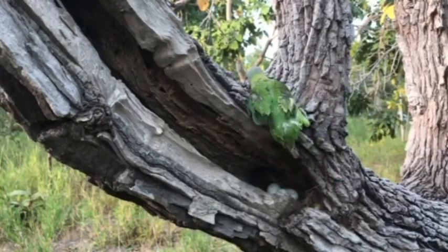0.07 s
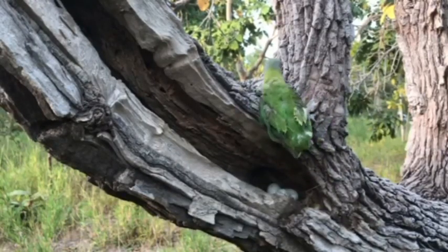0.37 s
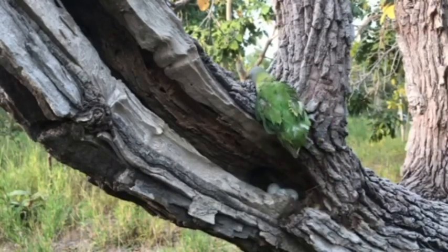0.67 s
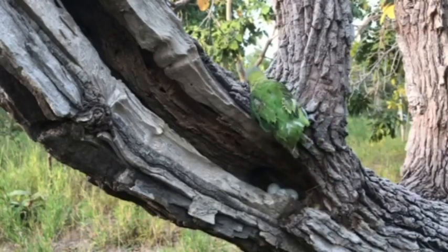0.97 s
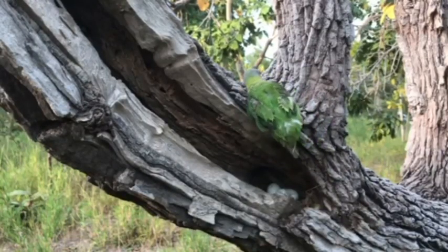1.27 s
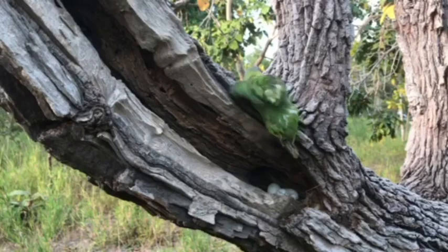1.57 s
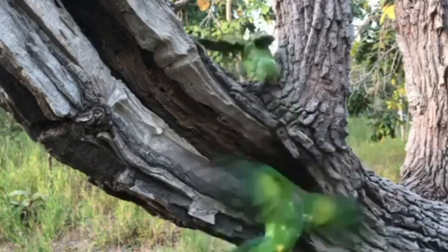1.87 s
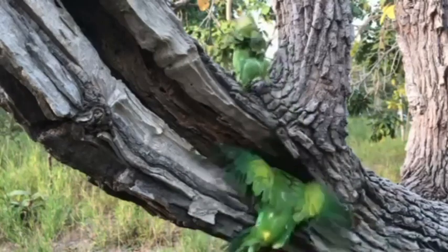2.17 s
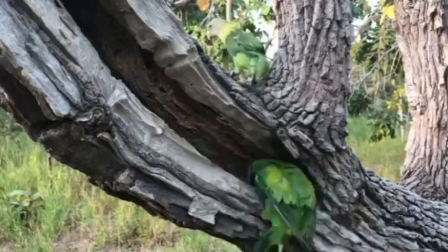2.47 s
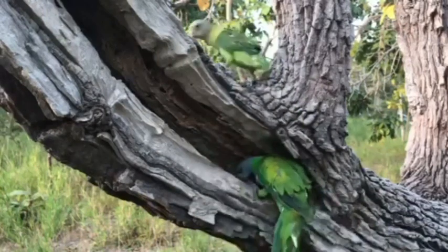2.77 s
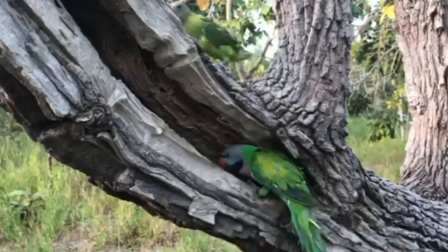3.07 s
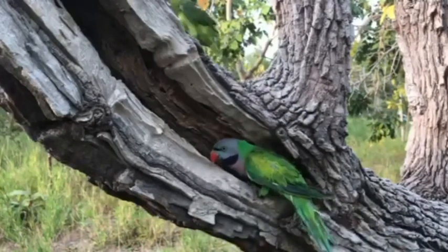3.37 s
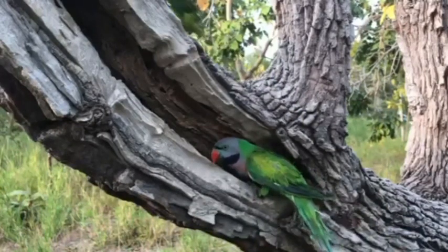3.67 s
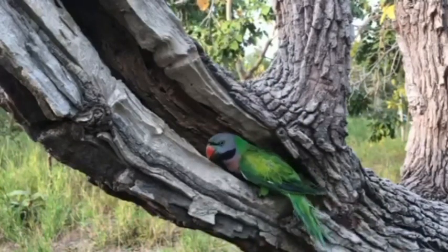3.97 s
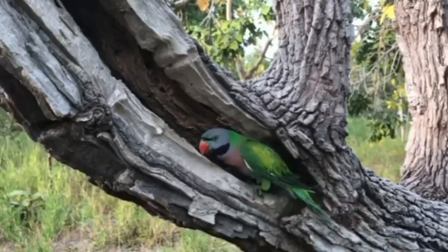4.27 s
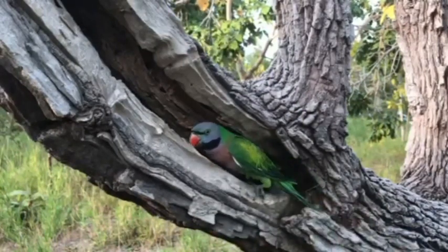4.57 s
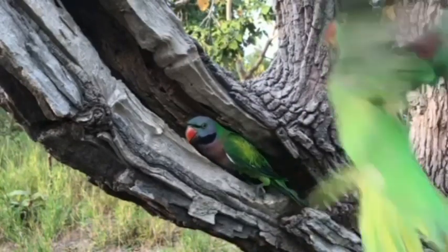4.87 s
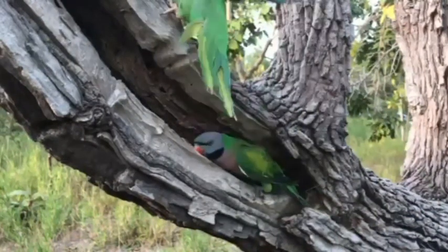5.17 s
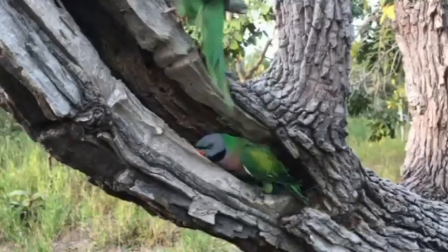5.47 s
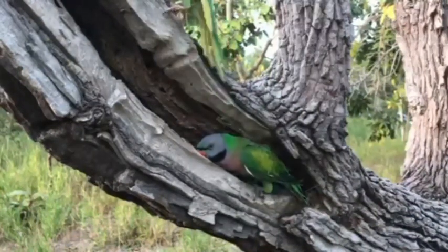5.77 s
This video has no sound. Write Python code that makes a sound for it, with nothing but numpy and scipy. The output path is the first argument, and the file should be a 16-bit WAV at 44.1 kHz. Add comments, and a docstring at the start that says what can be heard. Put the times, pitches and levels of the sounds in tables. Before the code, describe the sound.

A quiet forest with a soft hush of leaves, a low traffic rumble and a far engine gradually slowing is heard throughout. A faint distant whistle opens, and close claws tick lightly on bark. From about 1.6 to 2.3 seconds a parakeet lands with flapping wings, rustling feathers, sharp scratches and several dull knocks on a hollow limb. It gives a few soft, short nasal rasps between 2.1 and 2.9 seconds. Sparse ticks and shuffles follow, while a far bird faintly chatters and sings rising notes, ending on a hoarse falling one around 4.5 seconds. From 4.7 to 5.3 seconds comes the loudest moment: a second bird flutters past very close, its wings swishing and pushing thudding puffs of air at the microphone, with sharp clicks on bark and one knock. Light scratching and feather rustling continue until about 6 seconds.

```python
"""A parakeet flaps onto a dead tree and claws its way up the bark into a hollow. Later it takes off again in a
flurry of close wingbeats. Claws and wing tips tick and scrape on the bark, and heavy blows make the hollow limb
knock. Feathers rustle as they slide over each other, wings push puffs of air at the microphone, and a parakeet
gives short rasps. Behind it all are a few faint bird calls, a far engine slowing down and a quiet forest with a
low rumble of traffic."""
import sys
import numpy as np
from scipy import signal
from scipy.fft import rfft, irfft, next_fast_len
from scipy.io import wavfile
from scipy.ndimage import map_coordinates

SR = 44100
rng = np.random.default_rng(int(sys.argv[2]) if len(sys.argv) > 2 else 0)


def transcribe(signal):
    """Save signal, clipped to [-1, 1], as a 16-bit WAV file at the path in sys.argv[1]."""
    frames = np.atleast_2d(signal).T
    limited = np.clip(frames, -1, 1)
    pcm = np.round(limited * 32767).astype(np.int16)
    wavfile.write(sys.argv[1], SR, pcm)


N = 265967

# claws and wing tips striking bark: (time [s], level [dB], low knock [relative dB],
# brightness [dB per octave], ring of the struck flake [Hz], ring strength [dB], crumbling [0-1])
TAPS = [(0.425, -59, -6, 2, 1140, 11, 0.16), (0.7744, -61.5, 1, -6, 2800, 18, 0.02),
        (0.876, -63, 0, 16, 3060, 28, 0.17), (0.9349, -57, -1, 4.5, 3500, 14, 0.09),
        (1.043, -55.5, -3, 2.5, 5600, -2, 0.3), (1.3107, -50.5, -16, 3, 2600, 11, 0.07),
        (1.334, -62, -6, 4, 2800, 10, 0.07), (1.3848, -57, -6, 2, 2610, 17, 0),
        (1.4685, -54.5, -4, -0.5, 1100, 15, 0.6), (1.557, -61.5, -1, 7, 5630, 8, 0.4),
        (1.6105, -49.5, 4, 1, 2690, 2, 0.5), (1.632, -54, 5, -5, 1500, 7, 0),
        (1.7231, -42.5, -14, -0.5, 3400, 10, 0.34), (1.7511, -41, -3.5, 1, 2410, 1, 0.1),
        (1.7584, -42, 7, -1, 2150, 11, 0.14), (1.7729, -42.5, -3, 4, 4730, 14, 0.07),
        (1.812, -45.5, 12, 7, 5660, 8, 0.14), (1.866, -37.5, 15, 3, 5600, 8, .22),
        (1.908, -39, -0.5, -1, 800, 18, 0.7), (1.945, -45.5, 4, 2, 3270, 16, 0.06),
        (1.954, -49, 9, 0, 5500, 10, 0.4), (1.977, -47, 4, -0.5, 940, 13, 0.24),
        (2.041, -43.5, 8.5, 1.5, 1840, 9, 0.15), (2.048, -48, -2, 5, 1090, 15, 0.13),
        (2.081, -37.5, 1, 1.5, 1070, 11.5, 0.1), (2.083, -42, -1, 2, 3340, 28, 0.3),
        (2.1194, -45.5, -4, 1.5, 2200, 8, 0.4), (2.149, -50, -12, -4, 3380, -2, 0.13),
        (2.185, -52.5, 1, -1.5, 1000, 21, .2), (2.247, -55.5, 26, 1.5, 600, 6, 0.26),
        (2.309, -61, 2, 0.5, 1980, 1, 0.3), (2.354, -63, -8, -1, 3200, 10, 0.3),
        (2.4181, -52.5, 9, -13, 1640, 22, 0.1), (2.548, -62, -10, 9, 6140, 11, .12),
        (2.567, -52.5, -6, -2.5, 3730, 10, 0.2), (2.6472, -56.5, 9, -4.5, 3500, 18, 0.02),
        (2.604, -59.5, -6, 1, 5500, 9, .25), (2.69, -63.5, 2, 5.5, 3600, 0, 0.3),
        (2.881, -65, -6, 6, 4600, 5, 0.18), (3.026, -65.5, -5, 4, 4900, 16, .15),
        (3.092, -65, -6, -2, 3200, 8, 0.2), (3.121, -67, -2, 1, 5300, 9, 0.3),
        (3.137, -70, -6, 1, 5030, 10, 0), (3.166, -67, 0, -4, 1900, 10, 0.4),
        (3.3349, -55, 4, -4.5, 2620, 6, 0.2), (3.521, -65.5, -6, 4, 4190, 8, .1),
        (3.559, -64, -2, 3, 3000, 6, 0.23), (3.5878, -55.5, -10, 1.5, 2840, 13, 0.5),
        (3.8478, -65, -4, 2, 3880, 12, .2), (3.9075, -59, -5, 1, 2600, 22, 0.1),
        (3.9426, -63.5, -6, 0, 2700, 20, 0.12), (3.9908, -58, 0, 4, 2600, 16, 0.06),
        (4.097, -65, 0, -3, 1500, 12, 0), (4.3574, -63, -12, 9, 4600, 12, 0.23),
        (4.6005, -58.5, -4, 2.5, 1500, 12, 0.1), (4.673, -60, -6, -3, 4000, 3, 0.3),
        (4.698, -49.5, 10, 2, 980, 21, 0.3), (4.7467, -45, -13, -7, 2400, 14, 0),
        (4.7525, -45.5, -10, 1, 2600, 8, 0.1), (4.7682, -36.5, 0, -1.5, 4580, 13, 0.11),
        (4.792, -39.5, 13, 3, 4100, 7, 0.13), (4.8344, -26, -1, 0.5, 1273, 11, .06),
        (4.8793, -41, 14, 5.5, 4910, 5, 0.05), (4.8845, -55, -12, -1, 3600, 5, 0.1),
        (4.9601, -48, 1, -0.5, 3500, 7, 0), (4.9918, -33, 2.5, -9, 5500, 6, 0.13),
        (5.0026, -39.5, 4, -17, 1270, 20, 0.15), (5.045, -40, 22, 0, 1020, 12, 0.18),
        (5.064, -32, -5, -3.5, 1500, 2, 0.15), (5.0737, -32.5, -6, -2, 4230, 3, 0.04),
        (5.2041, -66, -6, 1, 4600, 11, 0.26), (5.2188, -59, -6, 3, 4800, 12, 0.4),
        (5.277, -57.5, -9, 0, 4700, 11, 0.24), (5.3146, -53, -12, 1, 4400, 10, 0.3),
        (5.3368, -45, 3.5, 0.5, 2200, 6.5, 0.09), (5.3724, -53.5, 8, -0.5, 1020, 8, 0.25),
        (5.4128, -61, 8, 3, 4900, 10, .1), (5.48, -61.5, -1.5, -5.5, 3200, 7, 0.26),
        (5.562, -65, -9, -5, 4200, 11, .2), (5.7147, -58.5, -2, -0.5, 4900, 11, 0.07),
        (5.7389, -64, -6, -3, 4600, 7, 0.06), (5.7607, -58, 3, -1, 4500, 6, 0.33),
        (5.7947, -68, -8, 2, 4500, 17, 0.14), (5.8586, -60.5, -10, 3, 4700, 10, 0.2),
        (5.896, -67, -6, -4, 4300, 7, 0.24), (5.9341, -58.5, -13, -2, 4200, 0, 0.14)]
# claws and quills dragged over bark: (time [s], length [s], level [dB], brightness [dB per octave])
SCRAPES = [(0.918, 0.022, -64, -16), (1.01, 0.01, -64, -21), (1.327, 0.0042, -64, 3),
           (1.355, 0.023, -71, 5), (1.411, 0.012, -64, -17), (1.432, 0.013, -81, 11),
           (1.567, 0.0069, -59, -0.5), (1.601, 0.027, -55.5, -2.5), (1.676, 0.013, -59, -6),
           (1.73, 0.0096, -47.5, -2.5), (1.754, 0.03, -53, -2), (1.843, 0.011, -41.5, -2),
           (1.883, 0.018, -45.5, 2), (1.899, 0.0043, -37, 1), (1.986, 0.0064, -38, 1.5),
           (2.08, 0.0065, -47.5, -1.5), (2.18, 0.016, -57, -2), (2.273, 0.0084, -51.5, 0.5),
           (2.809, 0.01, -60, -4), (2.847, 0.0094, -62, -6), (3.994, 0.036, -66, -3),
           (4.095, 0.026, -66.5, 1), (4.988, 0.011, -38, 2), (5.061, 0.0019, -32, 9),
           (5.07, 0.0034, -37, -4), (5.304, 0.024, -61.5, -1), (5.412, 0.0071, -60.5, -2),
           (5.447, 0.0032, -59, 10), (5.594, 0.01, -65, -2), (5.861, 0.0083, -68.5, -3),
           (5.888, 0.0085, -61.5, 0), (5.93, 0.0059, -60, -3)]
# tone of bark under a claw: (frequency [Hz], relative level [dB])
BARK_TONE = [(60, -15), (180, -5), (400, -0.5), (1100, -4.5), (1450, 1.5), (1950, 1), (2450, 0.5),
             (4100, 2.5), (4900, -1), (5600, -1.5), (6500, -7.5), (7450, -16), (8500, -7), (9700, -30)]
# heavier blows on the hollow limb: (time [s], level [dB], pitch of the spot [Hz])
KNOCKS = [(1.758, -43, 369), (1.866, -40, 434), (1.903, -38, 644), (1.993, -52, 383), (2.025, -53, 288),
          (2.124, -49, 300), (2.278, -53.5, 424), (4.8349, -38, 452)]
# the limb's ringing tones: (multiple of the pitch, relative level [dB], time to fade by 60 dB [s])
LIMB_TONES = [(1, 0, 0.038), (1.63, -6.5, 0.023), (2.4, -9, .022)]
# the bird shuffles, flutters and settles: (time [s], length [s], level [dB], extra treble [dB])
MOVES = [(0.697, 0.26, -76, -7), (1.309, 0.13, -67.5, 1), (1.531, 0.3, -65.5, 1), (1.582, 0.023, -63.5, 3),
         (1.756, 0.022, -59, 2), (1.846, 0.13, -54.5, -2.5), (1.985, 0.085, -57.5, 1),
         (2.1, 0.021, -63.5, -1), (2.17, .13, -71, 1.5), (2.328, 0.3, -72, -1), (3.081, 0.25, -74.5, -7),
         (3.551, 0.1, -73, -2), (3.83, 0.22, -75, 3), (4.6, 0.092, -71, 2), (4.712, 0.15, -51, -0.5),
         (4.9, 0.041, -52, -4), (5.008, 0.072, -60, 2), (5.09, .12, -70.5, 0.5), (5.219, 0.2, -68, 1),
         (5.462, 0.15, -75, 1), (5.636, 0.24, -73, 0.5)]
# tone of sliding feathers: (frequency [Hz], relative level [dB])
FEATHER_TONE = [(100, -3), (300, 1.5), (900, 1), (1500, 0), (2400, 0), (3300, 1), (4400, 0), (5600, -2),
                (6600, -4.5), (7450, -15), (8500, -5.5), (9400, -29)]
# wing strokes: (middle time [s], thud level [dB], top of the thud [Hz], swish level [dB])
WING_STROKES = [(1.628, -50.5, 60, -58), (1.715, -50, 57.3, -59), (1.76, -65, 111, -63),
                (1.825, -74, 120, -61), (1.895, -57.5, 147.4, -57), (1.935, -63, 140, -59.5),
                (2.021, -55, 100, -65), (4.742, -44.5, 60, -54), (4.796, -39, 110, -49.5),
                (4.838, -39, 64.6, -46.5), (4.872, -44, 69.7, -51.5), (4.91, -40, 59, -53),
                (4.965, -46, 63.5, -59), (5.076, -49.5, 80, -54.5), (5.143, -49, 185, -79.5),
                (5.206, -47.5, 150.7, -67.5), (5.251, -42, 134, -66), (5.428, -55, 74.5, -65)]
# tone of a wing's swish: (frequency [Hz], relative level [dB])
SWISH_TONE = [(60, -21), (200, 13.5), (350, 8.5), (750, 2), (1500, 0), (2500, -11), (4300, -3.5),
              (7000, -20), (9400, -37)]
# a parakeet's nasal rasps: (middle time [s], half length [s], level [dB])
RASPS = [(2.119, 0.048, -64.5), (2.346, 0.027, -70), (2.459, 0.074, -62), (2.544, 0.043, -68),
         (2.844, 0.042, -66)]
# tone of its throat: (frequency [Hz], relative level [dB])
THROAT_TONE = [(700, -15), (1250, -5), (1600, 6.5), (2150, 2.5), (2450, -29), (3000, -4), (3600, 0),
               (4300, -10), (6000, -34)]
# a far bird's whistle, arching up and down: (time [s], pitch [Hz], relative level [dB])
ARCHED_WHISTLE = [(0.052, 2530, -74), (.078, 2700, -73), (.1, 2735, -68), (.13, 2730, -75),
                  (0.146, 3197, -65), (.16, 3330, -70), (.178, 3520, -70), (.198, 3504, -66),
                  (.222, 3380, -74), (0.246, 3250, -68), (.256, 2467, -67), (0.299, 2464, -79),
                  (.315, 2580, -65.5), (.345, 2715, -73), (.365, 2740, -80)]
# a far song's rising notes: (time [s], length [s], middle pitch [Hz], rise [Hz], relative level [dB])
SONG_NOTES = [(3.226, 0.036, 2850, 750, -69.5), (3.323, 0.054, 2900, 1214, -68.5),
              (3.428, 0.046, 2490, 478, -78), (3.455, 0.051, 3080, 623, -69),
              (3.625, 0.051, 2750, 623, -70.5), (3.77, 0.066, 2600, 218.8, -76),
              (3.836, 0.05, 2765, 258, -66), (4.072, 0.082, 2614, 380, -72.5)]
# the hoarse falling note that ends the song: (time [s], pitch [Hz], relative level [dB])
FALLING_NOTE = [(4.372, 3050, -76), (4.408, 2488, -64.5), (4.455, 1950, -64), (4.5, 1444, -76),
                (4.55, 1042, -67.5)]
# a far engine slowing down: (time [s], firing rate [Hz], relative level [dB])
ENGINE_RUN = [(0, 38.81, -69), (1.15, 38.7, -75.5), (1.45, 38.14, -62.5), (2.5, 37.38, -57.5),
              (3.8, 35.69, -63), (4.4, 34.45, -62), (6.03, 31.73, -65.5)]
# tones of its exhaust: (multiple of the firing rate, relative level [dB])
EXHAUST_TONES = [(2, -6), (3, 0), (4, -4.5), (5, -13.5), (7, -19.5)]
# hush of leaves: (frequency [Hz], relative level [dB])
LEAF_TONE = [(100, -45), (200, 5), (400, 0), (800, -6.5), (1500, -6.5), (2700, -10.5), (4000, -10.5),
             (6000, -16), (7500, -16), (8600, -12), (9400, -35)]
# rumble of far traffic: (frequency [Hz], relative level [dB])
TRAFFIC_TONE = [(20, -25), (40, -4.5), (53, -4.5), (64, 4), (85, -4.5), (120, -10), (160, -9.5),
                (220, -27.5), (400, -60.5)]
# echo of a far sound among the trees: (frequency [Hz], time to fade by 60 dB [s])
ECHO_FADE = [(200, 0.81), (2000, 0.75), (4000, 0.47), (9000, 0.2)]

TOP_HZ = 9600  # upper edge of the treble


def taps(crush=0.15, crush_t60=0.0058, crumble_t60=0.033):
    """A sharp blow crushes the bark, which then crumbles. A t60 is the seconds taken to fade by 60 dB."""
    out, t = np.zeros(N), np.arange(SR // 20) / SR
    for s, db, knock_db, tilt_db, ring_hz, ring_db, crumble in TAPS:
        breaking = crumble * amp(-60 * t / crumble_t60) + crush * amp(-60 * t / crush_t60)
        force = noise(len(t)) * breaking
        force[0] = 1  # the blow itself
        tick = bark(force, knock_db, tilt_db, ring_hz, ring_db)
        add(out, s, amp(db) * np.sqrt(0.0044 * SR) * tick)
    return out


def knocks(attack_s=0.00072):
    """Struck dead wood rings with a few dull, short tones."""
    out, t = np.zeros(N), np.arange(SR // 12) / SR
    for s, db, hz in KNOCKS:
        ring = np.zeros(len(t))
        for ratio, tone_db, t60 in LIMB_TONES:
            fade = amp(tone_db + 2 * rng.standard_normal() - 60 * t / t60)
            ring += fade * np.sin(2 * np.pi * hz * ratio * t)
        add(out, s, amp(db) * (1 - np.exp(-t / attack_s)) * ring)
    return out


def scrapes(slip_rate=700, slip_db=-2.5, release_t60=0.034):
    """A claw catches and slips many times while it is dragged."""
    out = np.zeros(N)
    for s, length, db, tilt_db in SCRAPES:
        t = np.arange(int((length + release_t60) * SR)) / SR
        pressure = np.minimum(t / 0.002, 1) * amp(-60 * np.maximum(t - length, 0) / release_t60)
        force = pressure * amp(slip_db * wobble(slip_rate, len(t))) * noise(len(t))
        add(out, s, amp(db) * np.sqrt(length * SR) * bark(force, knock_db=1, tilt_db=tilt_db))
    return out


def crumbs(count=380, flake_hz=3400, t60=0.013):
    """Feet break off tiny ringing flakes of bark, more and louder the more the bird moves."""
    out, t = np.zeros(N), np.arange(SR // 50) / SR
    moving_db = np.minimum(movement_db(), -69)
    shed_so_far = np.cumsum(np.sqrt(amp(moving_db)))
    starts = np.searchsorted(shed_so_far, rng.random(count) * shed_so_far[-1])
    for start, (size, tilt, pitch) in zip(starts, rng.standard_normal((count, 3))):
        db = moving_db[start] + 2 + 3.5 * min(size, 1.7)
        force = noise(len(t)) * amp(-60 * t / t60)
        ring_hz = flake_hz * np.exp(0.5 * pitch)
        flake = bark(force, knock_db=0.37, tilt_db=2 * tilt - 1, ring_hz=ring_hz, ring_db=11)
        add(out, start / SR, amp(db) * np.sqrt(0.0023 * SR) * flake)
    return out


def bark(force, knock_db, tilt_db, ring_hz=3000, ring_db=0, ring_width_hz=330, size=4096):
    """Bark shaken by a force: the struck flake rings, and bending waves carry highs ahead of lows."""
    hz = np.fft.rfftfreq(size, 1 / SR)
    db = along(BARK_TONE, hz) + knock_db * along([(550, 0.89), (1100, 0.072)], hz)
    db += tilt_db * np.log2(np.clip(hz, 1600, TOP_HZ) / 3700)
    db += ring_db / (1 + ((hz - ring_hz) / ring_width_hz) ** 2)
    db += map_coordinates(noise(128), [hz / 300])  # each spot has its own tone
    # turn these levels into a response that rings only after the blow
    cepstrum = irfft(np.log(amp(db) * lowpass(hz, TOP_HZ, 20)))
    response = np.exp(rfft(np.r_[cepstrum[0], 2 * cepstrum[1:size // 2]], size))
    delay_s = 0.00056 * lowpass(hz, 1500, 2)  # the lows arrive last
    click = irfft(response * np.exp(-2j * np.pi * np.cumsum(delay_s) * hz[1]))
    sound = signal.fftconvolve(force, click)
    return sound / np.linalg.norm(sound)


def rustle(flutter_db=3.5, unsteady_db=1.96, flicks_per_s=600, treble_hz=3700):
    """Feathers slide unevenly over each other, and their tiny barbs catch and flick free."""
    sliding = unit(noise(N) * amp(flutter_db * wobble(70)))
    flicks = (rng.random(N) < flicks_per_s / SR) * noise(N)
    feathers = coloured(sliding + 0.5 * unit(flicks), FEATHER_TONE)
    brush = filtered(feathers, lambda hz: lowpass(hz, treble_hz, 6))
    hiss = feathers - brush
    moving = amp(movement_db()) * brush + amp(movement_db(treble=True)) * hiss
    return amp(unsteady_db * wobble(18)) * moving


def movement_db(treble=False, resting_db=-77.5, rise_s=0.17, fall_s=0.27):
    """Level of the feathers, or of their treble: every move rises quickly, holds and dies away."""
    t = np.arange(N) / SR
    power = amp(resting_db) ** 2
    for s, length, db, treble_db in MOVES:
        early, late = np.maximum(s - t, 0), np.maximum(t - s - length, 0)
        fade_db = 60 * (early / rise_s + late / fall_s)
        power = power + amp(db + treble * treble_db - fade_db) ** 2
    return 10 * np.log10(power)


def wings(half_stroke_s=0.046, fastest_eddy_hz=300):
    """Each stroke swishes and sends a thudding puff of swirling air against the microphone."""
    out, size = np.zeros(N), int(2 * half_stroke_s * SR)
    for s, thud_db, top_hz, swish_db in WING_STROKES:
        def thud_band(hz):
            return (1 - lowpass(hz, 35, 3)) * lowpass(hz, top_hz, 3) * lowpass(hz, fastest_eddy_hz, 8)
        thud = filtered(noise(size), thud_band)
        swish = coloured(noise(size) * amp(7.8 * wobble(300.8, size)), SWISH_TONE)
        add(out, s - half_stroke_s, amp(thud_db) * swell(thud) + amp(swish_db) * swell(swish))
    return out


def rasps(rough_db=4):
    """Rough bursts of noise pass through a parakeet's small throat."""
    out = np.zeros(N)
    for s, half_length, db in RASPS:
        size = int(2 * half_length * SR)
        breath = noise(size) * amp(rough_db * wobble(249, size))
        add(out, s - half_length, amp(db) * swell(coloured(breath, THROAT_TONE)))
    return out


def far_birds(gain_db=-2, chatter_start_s=2.582, gap_s=0.062, slowing_s=0.00093):
    """An arched whistle, then a song: slowing chatter, rising notes and a falling note, all echoing."""
    chatter, notes = np.zeros(N), np.zeros(N)
    for k in range(9):
        s = chatter_start_s + gap_s * k + slowing_s * k ** 2
        db = -72 + 0.07 * k + 2 * rng.standard_normal()
        add(chatter, s, amp(db) * rising_note(length=0.033, hz=3250, rise_hz=910, hoarse=0.45))
    for s, length, hz, rise_hz, db in SONG_NOTES:
        add(notes, s, amp(db) * rising_note(length, hz, rise_hz, hoarse=0.19))
    falling = gliding_note(FALLING_NOTE, hoarse=0.42)
    arched = gliding_note(ARCHED_WHISTLE, hoarse=0.11)
    calls = among_trees(arched + chatter, echo_db=-5.5) + among_trees(notes, echo_db=-9)
    return amp(gain_db) * (calls + among_trees(falling, echo_db=-0.5))


def rising_note(length, hz, rise_hz, hoarse):
    """A short bird note that sweeps up through the pitch hz."""
    return whistle(hz + rise_hz * np.linspace(-0.5, 0.5, int(length * SR)), hoarse)


def gliding_note(path, hoarse):
    """A long bird note that follows (time [s], pitch [Hz], level [dB]) points."""
    out = np.zeros(N)
    times, pitches, levels = np.transpose(path)
    t = np.arange(times[0], times[-1], 1 / SR)
    note = whistle(np.interp(t, times, pitches), hoarse)
    add(out, times[0], amp(np.interp(t, times, levels)) * note)
    return out


def whistle(hz, hoarse, edge_s=0.015):
    """A bird's tone along a pitch path; a hoarse one wavers fast and at random in pitch."""
    t = np.arange(len(hz)) / SR
    hz = hz * (1 + 0.2 * hoarse * wobble(1100, len(t)) + 0.005 * wobble(80, len(t)))
    fade = np.minimum(np.minimum(t, t[-1] - t) / edge_s, 1)
    loudness = fade * amp(2 * wobble(90, len(t)))
    return unit(loudness * np.sin(2 * np.pi * np.cumsum(hz) / SR))


def engine(gain_db=-1.6):
    """Only the low tones of the exhaust carry this far, each fading in and out."""
    t, hum = np.arange(N) / SR, np.zeros(N)
    times, firing_hz, levels = np.transpose(ENGINE_RUN)
    phase = 2 * np.pi * np.cumsum(np.interp(t, times, firing_hz)) / SR
    for multiple, db in EXHAUST_TONES:
        loudness = amp(db + 1.6 * wobble(5.02))
        drift = 0.18 * wobble(6) + 2 * np.pi * rng.random()
        hum += loudness * np.sin(multiple * phase + drift)
    return amp(np.interp(t, times, levels) + gain_db) * unit(hum)


def forest(leaves_db=-73.0, traffic_db=-65.5):
    """A hush of stirring leaves over the rumble of far traffic."""
    stirring_db = 0.4 * wobble(3) + 0.8 * wobble(30)
    leaves = amp(leaves_db + stirring_db) * coloured(noise(N), LEAF_TONE)
    traffic = amp(traffic_db + wobble(3.22)) * coloured(noise(N), TRAFFIC_TONE)
    return leaves + traffic


def among_trees(x, echo_db, reach=1.0):
    """A sound plus its thin echo off trunks and leaves, longer the further it reaches into the wood."""
    hz, t, bands = signal.stft(noise(SR), SR, nperseg=256)
    t60 = reach * along(ECHO_FADE, hz)[:, None]
    tail = signal.istft(bands * amp(-60 * t / t60), SR, nperseg=256)[1]
    return x + amp(echo_db) * signal.fftconvolve(x, tail / np.linalg.norm(tail))[:N]


def amp(db):
    """Turn decibels into a number to multiply by."""
    return 10 ** (np.asarray(db) / 20)


def unit(x):
    """Scale a sound to an average strength (rms) of 1."""
    return x / np.sqrt(np.mean(x ** 2) + 1e-20)


def noise(size):
    """Plain white noise."""
    return rng.standard_normal(size)


def wobble(rate, size=N):
    """A smooth curve through rate random values a second."""
    return map_coordinates(noise(int(size * rate / SR) + 4), [np.arange(size) * rate / SR])


def along(points, hz):
    """Read between (frequency [Hz], value) points, with octaves evenly spaced."""
    frequencies, values = np.transpose(points)
    return np.interp(np.log(hz + 1), np.log(frequencies + 1), values)


def lowpass(hz, edge_hz, steepness):
    """A curve that is near 1 below the edge and falls toward 0 above it."""
    return 1 / (1 + (hz / edge_hz) ** steepness)


def filtered(x, response):
    """Scale each frequency of a sound by response(hz)."""
    size = next_fast_len(len(x) + 8192)
    return irfft(rfft(x, size) * response(np.fft.rfftfreq(size, 1 / SR)), size)[:len(x)]


def coloured(x, tone):
    """Shape a sound with a tone table and scale it to strength 1."""
    return unit(filtered(x, lambda hz: amp(along(tone, hz))))


def swell(x):
    """Make a noise rise and fall smoothly."""
    return unit(x * np.hanning(len(x))) / np.sqrt(2)


def add(track, s, sound):
    """Mix a sound into a track from time s on."""
    start = max(round(s * SR), 0)
    track[start:start + len(sound)] += sound[:max(len(track) - start, 0)]


def scene():
    """The near bird with hardly any echo, far birds with more; both ears hear the same."""
    near = taps() + knocks() + scrapes() + rustle() + crumbs() + rasps()
    mono = among_trees(near, echo_db=-28.5, reach=0.22) + far_birds() + wings() + engine() + forest()
    return np.array([mono, mono])


def record(dry):
    """Cut off the highest treble, around TOP_HZ."""
    return np.array([filtered(x, lambda hz: np.clip((TOP_HZ - hz) / 300 + 0.5, 0, 1)) for x in dry])


dry = scene()
out = record(dry)
transcribe(out)
```